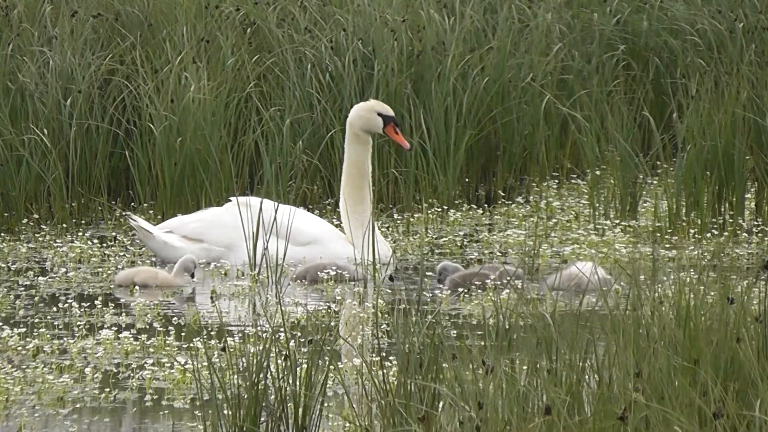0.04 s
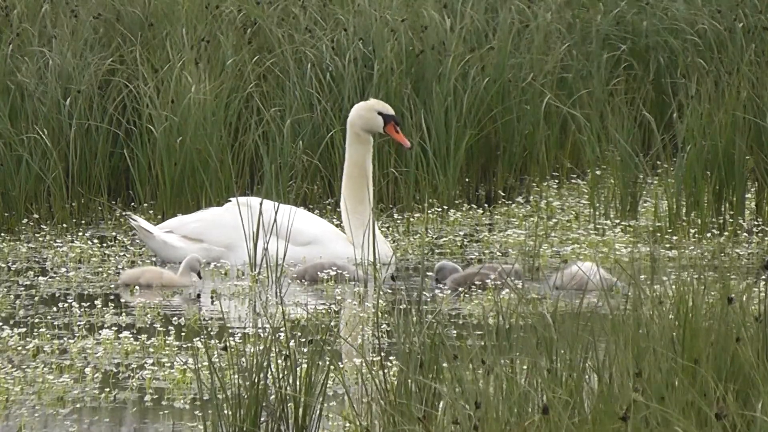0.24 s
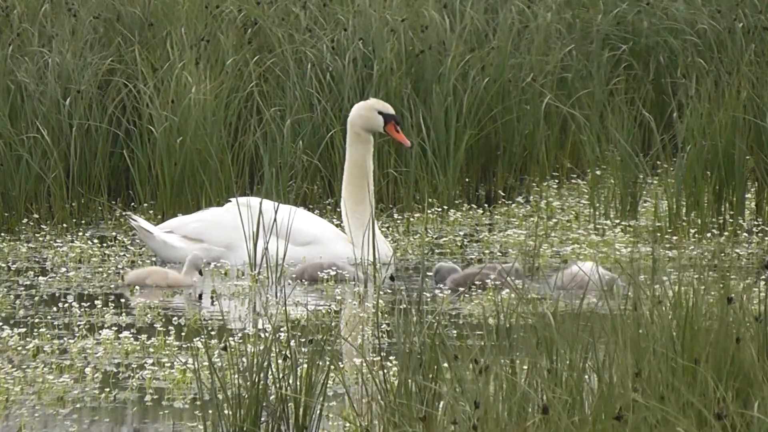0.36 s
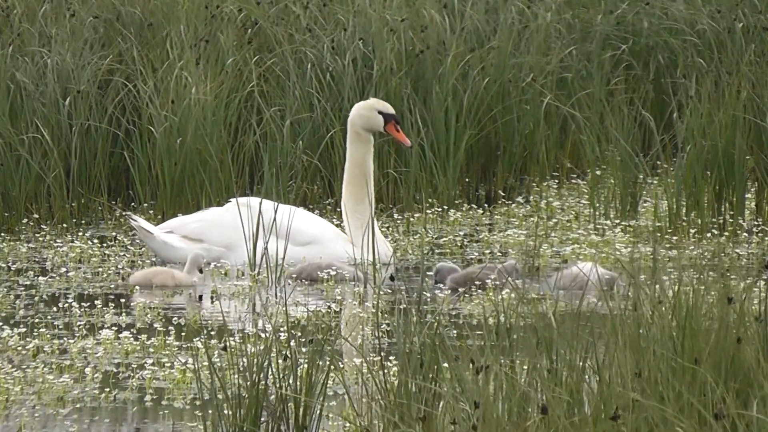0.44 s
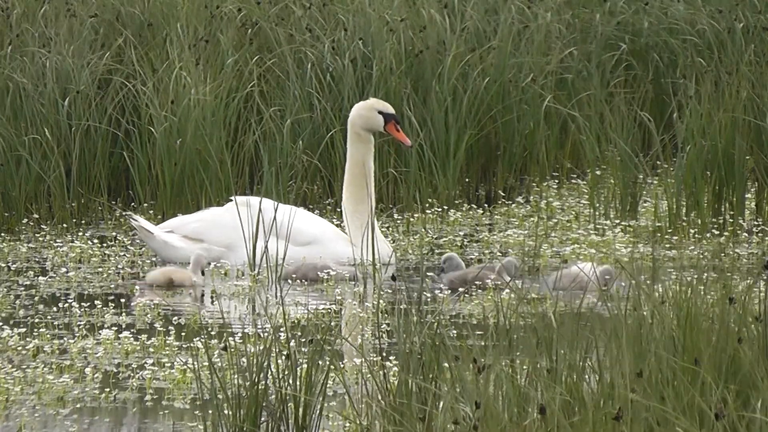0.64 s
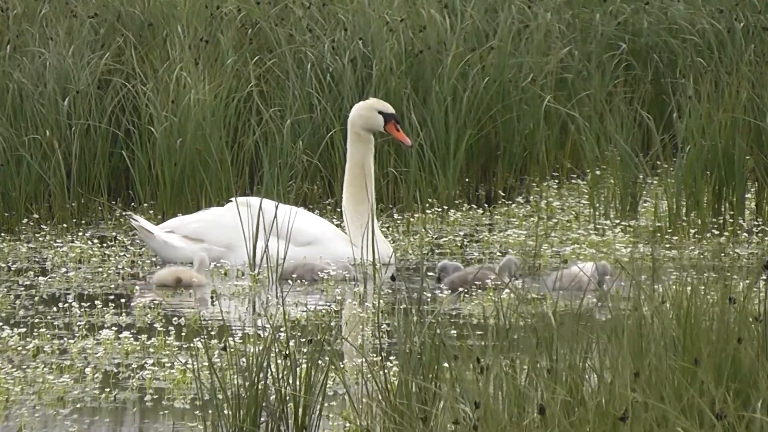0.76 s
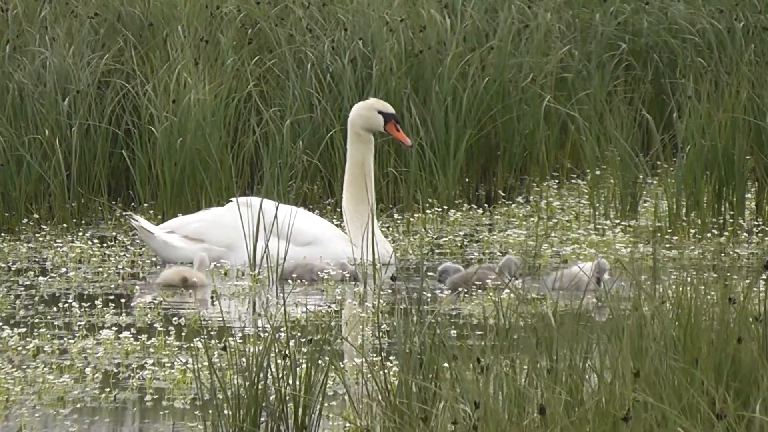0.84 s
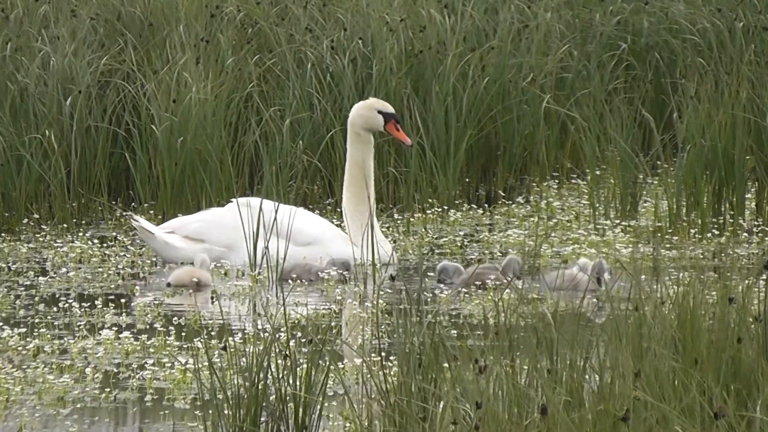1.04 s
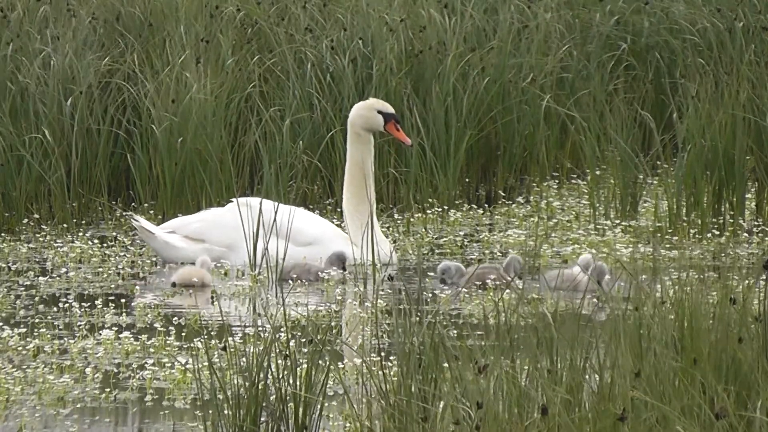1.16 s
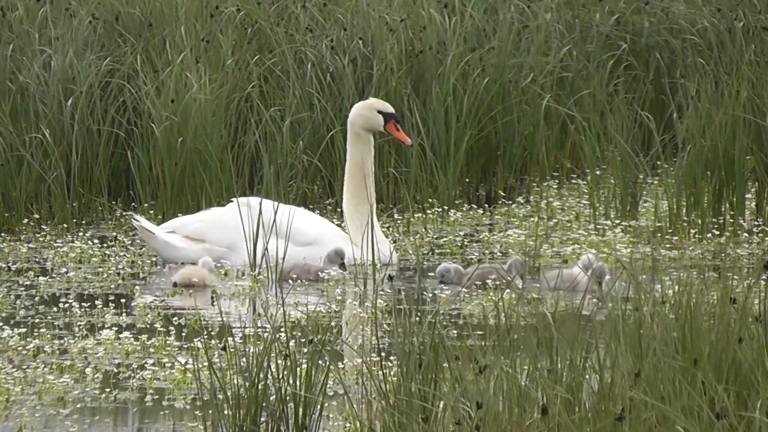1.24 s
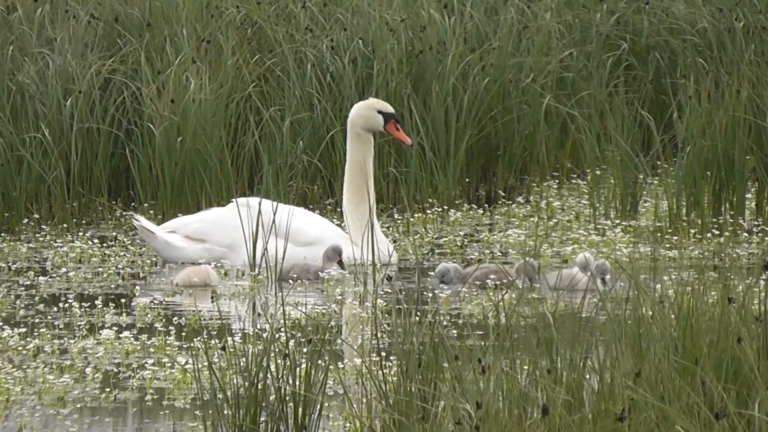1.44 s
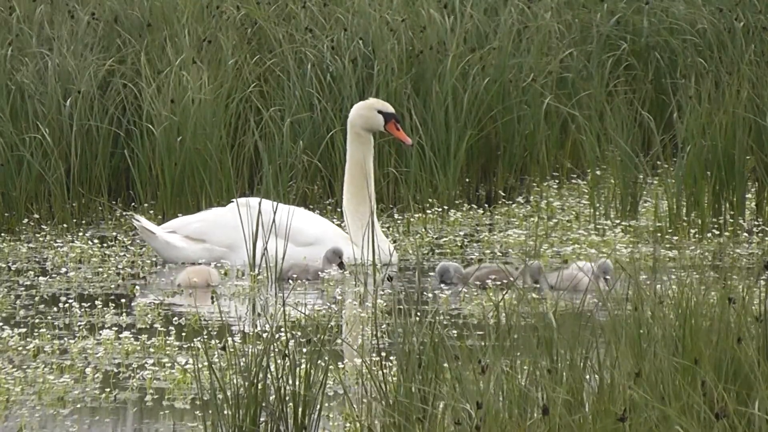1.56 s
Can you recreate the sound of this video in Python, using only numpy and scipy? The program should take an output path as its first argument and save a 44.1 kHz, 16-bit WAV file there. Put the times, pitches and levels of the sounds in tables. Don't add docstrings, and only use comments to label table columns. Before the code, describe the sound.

Swan family calls on a reedy pond: after a hard wind thump on the microphone, rasping croaks and a short falling honk, another croak, then a weaker late honk among faint peeps, over distant traffic hum.

```python
import sys
import numpy as np
from scipy import signal
from scipy.fft import rfft, irfft, next_fast_len
from scipy.io import wavfile
from scipy.ndimage import uniform_filter1d, map_coordinates

SR = 44100
rng = np.random.default_rng(int(sys.argv[2]) if len(sys.argv) > 2 else 0)


def pcm_store(signal):
    levels = np.round(np.clip(np.atleast_2d(signal), -1, 1) * 32767)
    wavfile.write(sys.argv[1], SR, levels.astype(np.int16).T)


def elevation(decibels):
    levels = np.asarray(decibels, float)
    return 10 ** (levels / 20)


N = 70560

# frequency_hz, density_db (per Hz)
HUM_SPECTRUM = [(30, -16), (60, 3), (170, -8), (260, -2.5), (650, -3.5), (1150, -9.5), (1900, -19),
                (2500, -34.5), (3900, -42.5)]
HISS_SPECTRUM = [(1290, -28.5), (2200, 0), (2700, -3), (4640, -1.5), (5160, -3.5), (7590, -6),
                 (15600, -15.5)]
# frequency_hz, correlation (0-1)
HUM_ALIKE = [(60, 0.56), (270, 0.55), (450, .75), (800, 0.85), (1100, .55), (1700, 0.3), (3000, 0.5)]
HISS_ALIKE = [(2500, 0.69), (6500, 0.88), (10000, 0.67), (15000, 0.52)]
# frequency_hz, left_over_right_db
HUM_PAN = [(300, 2), (600, 0), (1100, -4), (1600, -4), (2700, -1), (6000, -.5)]
CALL_PAN = [(800, 7.5), (1550, 2.5), (2400, 1)]
CROAK_PAN = [(700, -.5), (1500, -5), (2700, -5), (4500, -2.5)]
# frequency_hz, left_lead_rad
PORT_PHASE = [(100, -1), (270, -.5), (450, -.85), (800, -.85), (1100, -1.2), (1600, -0.65), (2700, -.35),
              (4500, -.1)]
# frequency_hz, t60_s
REED_DECAY = [(300, 0.13), (2000, 0.85), (3200, 0.15), (4700, 0.51), (12000, 0.52)]

# start_s, level_db, ring_hz (negative pulls first), right_late_ms, left_over_right_db
THUMPS = [(0.183, -35, 106.5, -0.5, -2), (0.2191, -16, 105.5, 0.5, -3.5), (0.229, -8.5, 138, -1.3, 0),
          (.243, -23, 155, 2, -16.5), (0.249, -18, 173, 0.5, -1), (0.2593, -15.5, -300, 1, -1),
          (0.262, -18, 262.5, 1, -0.5), (0.2671, -13.5, -230, 1, -5.5), (0.27, -11, 139.5, 1, 2),
          (.2615, -30, 467, 2, -5), (.267, -38.5, 762, -0.5, 0), (.2772, -29, 560, 2, 3),
          (0.279, -15, 174.5, 1.5, -4.5), (0.3138, -27, 336.5, 0, -1), (0.289, -22, 126, -1, 6),
          (.302, -28.5, 94.5, 3.5, 0), (0.312, -23.5, 104.5, -1, 2.5), (.332, -32, 77.5, 0, -0.5),
          (0.373, -35, 82.5, 0, 2.5), (0.419, -34.5, 72, -2.5, -4), (0.828, -42.5, 122, -0.5, 5),
          (0.845, -30.5, 52, 3, -3.5), (.864, -43, -230, 1.5, 5), (0.869, -28.5, 78.5, 0, 0),
          (.878, -33.5, 114, 1.5, -8), (0.886, -28, 135, 1.4, 2), (1.097, -46, 143, -2, 4)]
# time_s, level_db
BUFFET = [(.17, -57), (.21, -44.5), (.24, -41), (.27, -29), (.295, -35), (.33, -35), (.36, -58.5),
          (.45, -48), (.54, -52.5), (.62, -56.5), (.74, -57.5), (.81, -94), (.84, -43), (.9, -57),
          (.96, -64), (1.02, -58), (1.6, -60)]
# frequency_hz, density_db (per Hz)
BUFFET_SPECTRUM = [(20, -30), (50, -13), (90, 6), (160, 0), (260, -3), (340, -22), (700, -38), (1200, -120)]

# start_s, length_s, pitch_hz, glide_hz_per_s
PEEPS = [(.308, .014, 5700, -30000), (.302, .026, 4150, -17000), (.303, .03, 715, 1800),
         (.085, .045, 1520, -1200), (1.306, .03, 1430, 1800), (1.338, .03, 1490, 0), (1.366, .018, 1480, 0),
         (1.385, .014, 1680, 0), (1.404, .032, 1570, 1500), (1.16, .045, 1490, 0), (1.212, .055, 1490, 0),
         (.708, .035, 510, 0), (.765, .022, 850, 0)]
PEEP_LEVELS_DB = [-64, -62, -49, -54, -57, -58, -57, -60, -58, -62, -63, -54, -56]
PEEP_PARTIALS_DB = [4, -34]

# start_s, length_s, level_db, pitch_hz, glide_hz_per_s
HONKS = [
    (0.504, 0.058, -33, 831.4, -1150),
    (1.2642, 0.043, -38.5, 769, 0),
]
HONK_PARTIALS_DB = [
    [-2.5, -0.5, -11.5, -36, -37, -43, -26, -45, -35, -28.5],
    [1, -5.5, -13, -37],
]
# after_s, flat_by_hz, squeal_over_tone_db
BREAKS = [
    (.009, 93, -1.5),
    (0.0165, 48, 9),
]
# duration of the break [s], attack [s], release [s]
BREAK_S = [.0018, .0011]
HONK_ATTACK_S = [.011, .014]
HONK_RELEASE_S = [.034, .028]
# before the break, third partial over its later level [dB]; fourth partial's rise beyond the squeal's
# [dB]
SQUEAL_THIRD_DB = [-13, -4]
SQUEAL_FOURTH_DB = [-14, 12]
HIGHS_FADE_DB_PER_S = [65, 200]

# start_s, length_s, level_db, slows_after_s
CROAKS = [
    (.301, 0.072, -56, 0.0051),
    (0.329, 0.06, -49, .008),
    (0.463, 0.085, -42.5, .027),
    (0.6252, 0.073, -43.5, 0.027),
]
# breath share [0-1], fade after slowing [dB]
BREATH_SHARE = [.6, .3, .04, .02]
CROAK_FADE_DB = [12, 8, 12, 10.5]
# centre_hz, one row per croak
FAST_THROAT_HZ = [
    [730, 1350, 2100, 4150, 5600, 5500],
    [700, 1400, 1800, 3750, 5020, 4750],
    [760, 1830, 2300, 3750, 4960, 4700],
    [700, 1860, 2120, 3900, 4700, 5080],
]
SLOW_THROAT_HZ = [
    [730, 1700, 2150, 3750, 5400, 5300],
    [700, 1850, 1450, 3720, 4950, 4900],
    [660, 2000, 2200, 3720, 4760, 4990],
    [680, 1950, 2100, 3780, 4700, 4950],
]
THROAT_DB = [
    [-4, 6, -6, -6, -16, -16],
    [-14.5, 0, 5, -7, -3, -12],
    [1, 0.5, -13.5, -7.5, -4, -10],
    [3, 0.5, -1.5, -3.5, 1, -13],
]
# width [Hz], change after slowing [dB] (the low ones gain, the next two hold, the last drops
THROAT_WIDTH_HZ = [120, 170, 190, 230, 170, 220]
SLOW_CHANGE_DB = [3, 2.5, 2.5, 0, -0.5, -22.5]
# when the throat shifts [s], its cut-off [Hz], what passes above that [dB]
THROAT_SHIFT_AT_S = [.008, .014, .015, .018]
THROAT_TOP_HZ = [5800, 5350, 5350, 5250]
AIR_DB = [-31.5, -38, -12.5, -27]
SLOW_VALLEY_DB = [-20, -24, -15, -11]
LOW_OPENS_S = [.005, .003, .007, .009]
LOW_FADE_DB = [0, 2, 8, 10]


def unit(x):
    return x / np.sqrt(np.mean(x ** 2) + 1e-20)


def along(points, hz):
    f, v = np.transpose(points)
    return np.interp(np.log(hz + 1), np.log(f + 1), v)


def wobble(rate):
    return map_coordinates(rng.standard_normal(400), [np.arange(N) * rate / SR])


def filtered(x, response):
    m = next_fast_len(N + SR // 2)
    return irfft(rfft(x, m) * response(np.fft.rfftfreq(m, 1 / SR)), m)[..., :N]


def ramp_envelope(rise, fall):
    return np.sin(np.pi / 2 * np.clip(np.minimum(rise, fall), 0, 1))


def rush(spectrum, alike, patchy_db):
    z = signal.stft(rng.standard_normal((2, N)), nperseg=512)[2]
    patches = uniform_filter1d(rng.standard_normal(z.shape[1:]), 5, 0)
    patches = unit(uniform_filter1d(patches, 10, 1))
    pair = signal.istft(z * elevation(patchy_db * patches), nperseg=512)[1][:, :N]

    def mid_side(hz):
        turn = np.arccos(np.clip(along(alike, hz), -1, 1)) / 2
        return elevation(along(spectrum, hz)) * [np.cos(turn), np.sin(turn)]

    mid, side = filtered(pair, mid_side)
    return unit(np.array([mid + side, mid - side]))


def background():
    gust = np.interp(np.arange(N) / SR, *np.transpose(BUFFET))
    gust = np.clip(uniform_filter1d(gust, size=6000) + 58, 0, None)
    hum_db = -51 + 0.6 * (wobble(0.77) + wobble(12.33))
    hum = elevation(hum_db) * rush([(13, -81)] + HUM_SPECTRUM + [(6000, -120)], HUM_ALIKE, patchy_db=2.0)
    hiss_db = -69 + 0.2 * wobble(6.6)
    hiss = elevation(hiss_db) * rush([(1200, -120)] + HISS_SPECTRUM, HISS_ALIKE, patchy_db=1.5)
    return elevation(0.069 * gust) * (hum + hiss)


def wind_on_ports():
    cycles, rise = 5.6, 0.2
    t, thumps = np.arange(N) / SR, np.zeros((2, N))
    for start, db, hz, late_ms, pan_db in THUMPS:
        u = np.clip(t - start - np.array([[-late_ms], [late_ms]]) / 2000, 0, None)
        swings = u * abs(hz)
        push = np.sin(2 * np.pi * hz * u) * elevation(-60 * swings / cycles) * (1 - np.exp(-swings / rise))
        thumps += elevation(db + 4 + np.array([[pan_db], [-pan_db]]) / 2) * push
    thumps = filtered(thumps, lambda f: 1 / (1 + (f / 850) ** 4) / (1 + (55 / (f + 1)) ** 4))
    level_db = np.interp(t, *np.transpose(BUFFET)) + 0.96 * np.array([wobble(17), wobble(37)])
    rumble = rush(BUFFET_SPECTRUM, [(60, 0.81), (300, 0.14)], patchy_db=-3.0)
    return thumps + elevation(level_db) * rumble


def reeds(x):
    far_bank_s = .035
    common = 6.2 * rng.standard_normal(SR // 2)
    noise = rng.standard_normal((2, SR // 2)) + common
    hz, t, z = signal.stft(noise, SR, nperseg=256)
    tail = signal.istft(z * elevation(-60 * t / along(REED_DECAY, hz)[:, None]), SR, nperseg=256)[1]
    delayed = np.pad(x, (round(far_bank_s * SR), 0))[None]
    return signal.fftconvolve(delayed, tail / np.linalg.norm(tail[0]), axes=1)[:, :N]


def peeps():
    t, out = np.arange(N) / SR, np.zeros(N)
    for (start, length, hz, glide), db in zip(PEEPS, PEEP_LEVELS_DB):
        u = (t - start) / length
        pitch = hz + glide * np.clip(t - start, 0, length) + 8 * hz / 700 * wobble(150)
        phase = 2 * np.pi * np.cumsum(pitch) / SR
        level = elevation(db + 2.5 * wobble(180)) * ramp_envelope(u / 0.4, (1 - u) / 0.6)
        out += level * sum(elevation(g) * np.sin((k + 1) * phase) for k, g in enumerate(PEEP_PARTIALS_DB))
    return out


def honks():
    t, out = np.arange(N) / SR, np.zeros(N)
    for i, (start, length, db, hz, glide) in enumerate(HONKS):
        after, flat_hz, squeal_db = BREAKS[i]
        u = t - start
        early = .5 - .5 * np.tanh((u - after) / BREAK_S[i] / 2)
        since_break = np.clip(u - after, 0, length)
        pitch = hz - flat_hz * early + glide * since_break + 4 * wobble(149.8)
        phase = 2 * np.pi * np.cumsum(pitch) / SR
        change_db = [-26, squeal_db, SQUEAL_THIRD_DB[i], squeal_db + SQUEAL_FOURTH_DB[i]] + [-20] * 7
        tone = np.zeros(N)
        for k, (partial_db, change) in enumerate(zip(HONK_PARTIALS_DB[i], change_db)):
            level_db = partial_db + change * early - HIGHS_FADE_DB_PER_S[i] * k * since_break
            tone += elevation(level_db) * np.sin((k + 1) * phase + k)
        shape = ramp_envelope(u / HONK_ATTACK_S[i], (length - u) / HONK_RELEASE_S[i])
        out += elevation(db + 1.2 * wobble(120)) * shape * tone
    return out


def throat(f, centres, levels, valley_db):
    rings = [elevation(db) * 1j * f * w / (c * c - f * f + 1j * f * w)
             for c, w, db in zip(centres, THROAT_WIDTH_HZ, levels)]
    valley = elevation(valley_db) * 1j * f * 900 / (3100 ** 2 - f * f + 1j * f * 900)
    return [rings[1] + rings[2] + rings[0], sum(rings[3:]) + valley]


def voice_pulses(t, slows, breath_share):
    fast_hz, slow_hz, slowing_s = 357, 205, .004
    jitter, size_db = .01, .3
    scatter, breath = rng.standard_normal((2, 60)), rng.standard_normal(len(t))
    fast = 1 / (1 + np.exp((t - slows) / slowing_s))
    cycle = np.cumsum(slow_hz + (fast_hz - slow_hz) * fast) / SR + .7
    beats = np.arange(1, int(cycle[-1]))
    moments = beats + jitter * (1 + 20 * breath_share) * scatter[0, beats]
    at = np.interp(moments, cycle, np.arange(len(t)))
    taps = np.clip(at.astype(int)[:, None] + np.arange(-7, 9), 0, len(t) - 1)
    size = elevation(size_db * (4.0 + 2 * breath_share) * scatter[1, beats])[:, None]
    kick = np.sinc(taps - at[:, None]) * np.hanning(18)[1:-1] * size
    pulses = unit(np.bincount(taps.ravel(), kick.ravel(), len(t)))
    puffs = unit(breath * np.exp(-3 * (cycle % 1)))
    return np.sqrt(1 - breath_share) * pulses + np.sqrt(breath_share) * puffs


def croaks():
    t, out = np.arange(SR // 10) / SR, np.zeros(N)
    for k, (start, length, db, slows) in enumerate(CROAKS):
        source = voice_pulses(t, slows, BREATH_SHARE[k])
        opening = np.interp(t, [0, .006, slows], [.45, .9, 1])
        fade = elevation(-CROAK_FADE_DB[k] * np.clip((t - slows) / (length - slows), 0, 1))
        shape = opening * fade * np.clip((length - t) / .016, 0, 1)
        early = 1 / (1 + np.exp((t - THROAT_SHIFT_AT_S[k]) / .005))
        low_fade = elevation(-LOW_FADE_DB[k] * np.clip((t - slows - .01) / .02, 0, 1))
        low = np.clip(t / LOW_OPENS_S[k], .2, 1) * low_fade
        weights = np.array([early, 1 - early])[:, None] * [low, np.ones(len(t))]
        parts = np.zeros((2, 2, N))
        first = round(start * SR)
        parts[..., first:first + len(t)] = elevation(db + 11.0) * shape * source * weights

        def response(f):
            top = 1 / (1 + (f / THROAT_TOP_HZ[k]) ** 20) + elevation(AIR_DB[k]) / (1 + (f / 10000) ** 4)
            before = throat(f, FAST_THROAT_HZ[k], THROAT_DB[k], -19)
            after = throat(f, SLOW_THROAT_HZ[k], np.add(THROAT_DB[k], SLOW_CHANGE_DB), SLOW_VALLEY_DB[k])
            return np.array([before, after]) * top

        out += filtered(parts, response).sum(axis=(0, 1))
    return out


def scene():
    rasp, calls = croaks(), honks() + peeps()
    side = np.array([[.5], [-.5]])

    def panned(x, pan):
        return filtered(x, lambda f: elevation(side * along(pan, f)))

    air = panned(rasp, CROAK_PAN) + panned(calls, CALL_PAN) + panned(background(), HUM_PAN)
    air = air + reeds(elevation(-14) * rasp + elevation(-23) * calls)
    return filtered(air, lambda f: np.exp(1j * side * along(PORT_PHASE, f))) + wind_on_ports()


def low_pass(x):
    return signal.sosfilt(signal.butter(12, 15760, fs=SR, output="sos"), x)


def record(dry):
    return low_pass(dry)


dry = scene()
out = record(dry)
pcm_store(out)
```